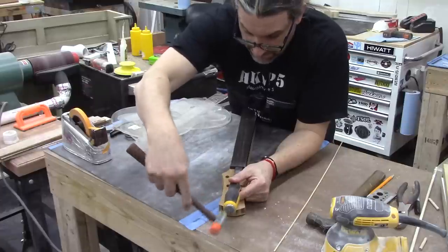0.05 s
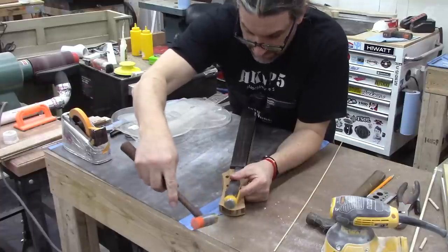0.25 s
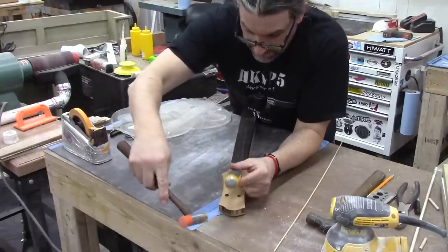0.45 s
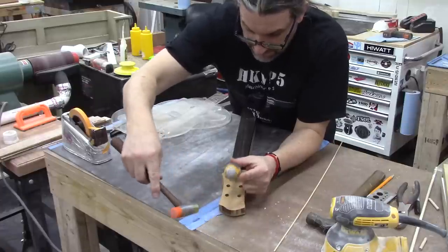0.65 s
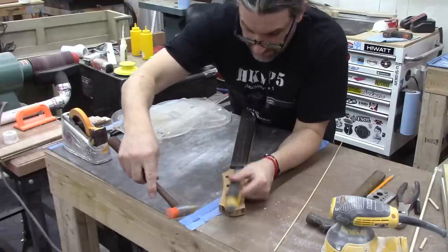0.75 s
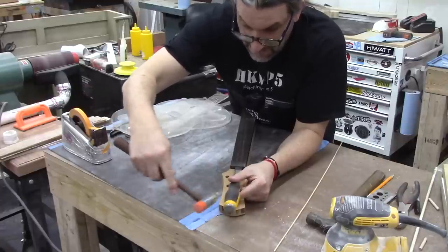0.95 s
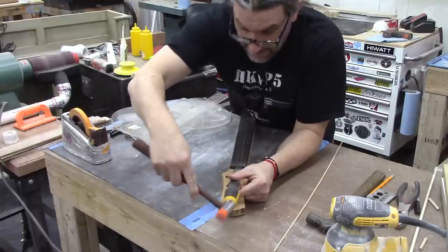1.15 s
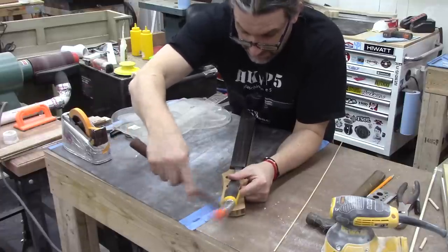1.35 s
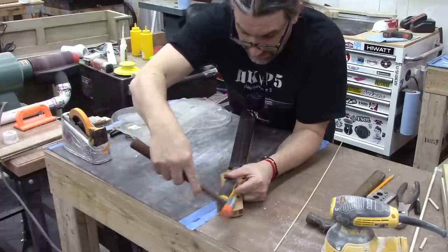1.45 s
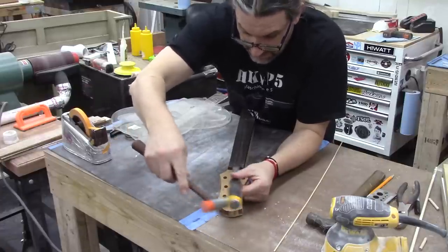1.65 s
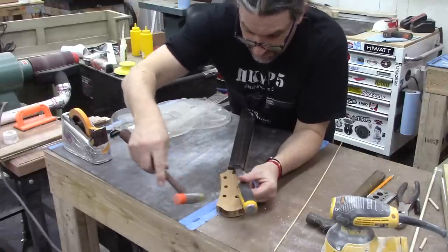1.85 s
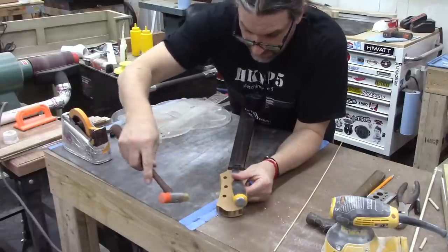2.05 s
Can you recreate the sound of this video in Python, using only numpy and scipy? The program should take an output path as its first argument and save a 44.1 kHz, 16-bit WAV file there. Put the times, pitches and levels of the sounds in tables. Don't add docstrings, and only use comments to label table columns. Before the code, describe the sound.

Hammer blows on hardwood: the echoing tail of one strike fades, a soft thud and tiny gritty ticks follow, then two quick sharp knocks ring out in a large workshop, picked up fairly close with squeezed attacks.

```python
import sys
import numpy as np
from scipy import signal
from scipy.fft import rfft, irfft
from scipy.io import wavfile
from scipy.ndimage import uniform_filter1d

SR = 44100
rng = np.random.default_rng(int(sys.argv[2]) if len(sys.argv) > 2 else 0)


def gain_from_db(level_db):
    decades = np.asarray(level_db, float) / 20
    return 10 ** decades


def generate_wav(signal):
    frames = np.transpose(np.atleast_2d(signal))
    scaled = np.clip(frames, -1, 1) * 32767
    pcm = np.round(scaled).astype(np.int16)
    wavfile.write(sys.argv[1], SR, pcm)


N = 92169
LEAD = 4410


def read(points, hz):
    f, value = np.transpose(points)
    return np.interp(np.log(hz + 1), np.log(f + 1), value)


def evened(x):
    return x / np.sqrt(np.mean(x ** 2) + 1e-20)


def coloured(x, points):
    size = x.shape[-1]
    return irfft(rfft(x) * gain_from_db(read(points, np.fft.rfftfreq(size, 1 / SR))), size)


def causal(gain):
    return np.fft.ifft(np.exp(np.conj(signal.hilbert(np.log(gain))))).real[:4096]


def add(mix, s, sound):
    part = mix[round(s * SR) + LEAD:][:len(sound)]
    part += sound[:len(part)]


def alternating_modes(modes, t):
    total = 0
    for k, (hz, db, t60) in enumerate(modes):
        total = total + (-1) ** k * gain_from_db(db - 60 * t / t60) * np.sin(2 * np.pi * hz * t)
    return total


# (frequency [Hz], level [dB per Hz])
AIR_SPECTRUM = [(25, -34), (60, -13), (110, -1), (300, -6.5), (800, -14), (2500, -22.5), (11000, -35.5),
                (16000, -52)]
# (centre [s], half length [s], level [dB], brightness [dB per octave])
RUSTLES = [
    (0.737, 0.015, -56, 0.5),
    (0.986, 0.085, -57.5, 0),
    (1.77, 0.12, -58, 4.5),
]
# (frequency [Hz], level [dB per Hz])
RUB_SPECTRUM = [(470, -56.5), (800, -14.5), (1690, 1), (2080, -5), (2970, -10), (4510, -11), (15000, -32)]
AIR_DB = -52.5
MOAN_S, MOAN_HALF_S, MOAN_HZ, MOAN_DB = 0.555, 0.078, 220, -51


def air():
    t = np.arange(N) / SR
    mid, side, rub = rng.standard_normal((3, N))
    waver = gain_from_db(1.2 * evened(uniform_filter1d(rng.standard_normal(N), size=3000)))
    grain = gain_from_db(1.9 * evened(uniform_filter1d(rng.standard_normal(N), size=150)))
    mid = gain_from_db(AIR_DB) * evened(coloured(mid, AIR_SPECTRUM)) * waver
    for s, half_s, db, tilt_db in RUSTLES:
        tilted = [(hz, top + tilt_db * np.log2(hz / 3000)) for hz, top in RUB_SPECTRUM]
        stroke = np.exp(-((t - s) / half_s) ** 2)
        mid += gain_from_db(db) * stroke * grain * evened(coloured(rub, tilted))
    swell = np.exp(-((t - MOAN_S) / MOAN_HALF_S) ** 2)
    mid += gain_from_db(MOAN_DB) * waver * swell * np.sin(2 * np.pi * MOAN_HZ * t)
    side = gain_from_db(AIR_DB - 10.5) * evened(coloured(side, AIR_SPECTRUM))
    return np.array([mid + side, mid - side])


# (frequency [Hz], level [dB], t60 [s])
THUD_MODES = [(105, 0, .35), (175, -1, .25), (215, -4, .2), (295, -4, .2), (400, -8, .25), (540, -4, .1),
              (650, -7, .2), (790, -5, .05)]
# (time [s], level [dB], frequency [Hz])
TICKS = [
    (.728, -54, 9000),
    (.752, -48, 7000),
    (.879, -47, 2500),
    (.943, -50, 9000),
    (.972, -46, 4600),
    (1.682, -48, 7500),
    (1.697, -51, 11000),
    (2.087, -48, 8500),
]
THUD_S, THUD_RISE_S, THUD_DB = .751, .002, -38.5
TICK_S = .0012


def handling():
    out, t = np.zeros(N + LEAD), np.arange(9000) / SR
    thud = alternating_modes(THUD_MODES, t)
    add(out, THUD_S, gain_from_db(THUD_DB) * thud * (1 - np.exp(-t / THUD_RISE_S)))
    t = t[:400]
    grit = rng.standard_normal((len(TICKS), 400))
    for (s, db, hz), noise in zip(TICKS, grit):
        add(out, s, gain_from_db(db) * np.exp(-t / TICK_S) * (np.sin(2 * np.pi * hz * t) + 0.42 * noise))
    return out


# (frequency [Hz], t60 [s])
HALL_T60 = [(100, 0.41), (330, 1.24), (700, 0.98), (1100, 1.162), (2300, 0.94), (4500, 0.74), (7000, .5),
            (16000, 0.31)]
# (frequency [Hz], side under mid [dB])
HALL_SPREAD = [(60, -34), (180, -59), (550, -31), (1650, -21), (4970, -13.5), (15000, -17)]
HALL_RISE_S, HALL_TOP_HZ = .013, 14600


def hall(x):
    hz, t, z = signal.stft(rng.standard_normal((2, 70000)), SR, nperseg=256)
    z = z * gain_from_db(-60 * t / read(HALL_T60, hz)[:, None]) / (1 + (hz[:, None] / HALL_TOP_HZ) ** 20)
    tail = signal.istft(z, SR, nperseg=256)[1][:, :70000]
    tail = tail * (1 - np.exp(-(np.arange(70000) / SR / HALL_RISE_S) ** 1.3))
    mid, side = tail[0], coloured(tail[1], HALL_SPREAD)
    taps = np.array([mid + side, mid - side]) / np.linalg.norm(mid)
    return signal.fftconvolve(x[None], taps, axes=1)[:, :len(x)]


def scatter(spread_s):
    t = np.arange(1024) / SR
    z = rfft(rng.standard_normal((2, 1024)) * np.exp(-(t / spread_s) ** 2))
    flat = irfft(z / (abs(z) + .25 * abs(z).mean()))[:, :512]
    mid, side = flat * np.exp(-(t[:512] / (2 * spread_s)) ** 2)
    return np.array([mid + .1 * side, mid - 0.14 * side]) / np.linalg.norm(mid)


# (delay [s], level [dB], lean to the left [ratio])
ECHOES = [
    (.0112, -11, .1),
    (.0208, -10, -.1),
    (.031, -13, .1),
]
# (frequency [Hz], level [dB])
NEAR_COLOUR = [(100, -14), (700, 0), (1600, -5), (2600, -0.5), (4300, 4), (6000, -2.5), (8500, 8.5),
               (16000, 6.5)]
RATTLE_S, RATTLE_DB = 0.0051, 3


def near(x):
    taps = np.zeros((2, 3000))
    taps[:, :512] = gain_from_db(RATTLE_DB) * scatter(RATTLE_S)
    for s, db, lean in ECHOES:
        echo = gain_from_db(RATTLE_DB + db) * scatter(RATTLE_S / 2) * [[1 + lean], [1 - lean]]
        taps[:, round(s * SR):][:, :512] += echo
    hz = abs(np.fft.fftfreq(8192, 1 / SR))
    direct = signal.oaconvolve(x, causal(gain_from_db(read(NEAR_COLOUR, hz))))
    return signal.oaconvolve(direct[None], taps, axes=1)[:, :len(x)]


# (time [s], modes [(frequency [Hz], level [dB], t60 [s])])
KNOCKS = [
    (1.1319, [(1640, -4.5, 0.05), (2075, -4, 0.052), (2440, -11, 0.039), (4440, -11.5, 0.036), (8670, -12, 0.022)]),
    (1.353, [(2540, -4.5, 0.029), (3000, -23, .025), (3880, -8, 0.022), (4350, -21, 0.028), (7360, -2, 0.015)]),
]
KNOCK_RISE_S = 0.0017


def knocks():
    out, t = np.zeros(N + LEAD), np.arange(4000) / SR
    for s, modes in KNOCKS:
        add(out, s, alternating_modes(modes, t) * (1 - np.exp(-t / KNOCK_RISE_S)))
    return out


def blow(db, modes, colour):
    hz = abs(np.fft.fftfreq(16384, 1 / SR))
    ring = sum(gain_from_db(2 * top_db) / (1 + (2 * (hz - f) / width) ** 2) ** 0.85 for f, width, top_db in modes)
    crack = gain_from_db(2 * read(colour, hz))
    return gain_from_db(db) * 10 * causal(np.sqrt(ring * (hz / (hz + 300)) ** 2 + crack))


# (time [s], level [dB])
BLOWS = [
    (-.03, 3),
    (1.1297, 10),
    (1.352, 5.5),
]
# (frequency [Hz], width [Hz], level [dB])
BLOW_MODES = [
    [(459.5, 44, -2), (951, 41, 8), (1139, 31, 8.5), (1350, 74, -4), (2002, 122, 7.5), (2879, 46, 5.5),
     (3000, 40, -19), (3846, 92, 0), (4490, 260, -6), (5370, 360, -4)],
    [(440, 53, -16), (1640, 54, -3), (2063, 81, -2), (2394, 300, -10.5), (2900, 90, -30), (2926, 41, -6.5),
     (3770, 33, -18.5), (3984, 140, -14.5), (5200, 270, -16), (9010, 190, -20.5)],
    [(969, 20, -2.5), (1506, 90, -2.5), (2110, 93, -7.5), (2540, 33, 1), (2910, 107, -2.5),
     (3820, 110, -8.5), (4360, 150, -7), (5170, 450, -10), (5590, 140, -9.5), (7300, 680, -15.5)],
]
# (frequency [Hz], level [dB per Hz])
BLOW_CRACKS = [
    [(60, -39), (160, -16), (700, -30.5), (2500, -3), (6000, -19.5), (10000, -25.5), (14000, -36),
     (16500, -27)],
    [(60, -48), (160, -22), (700, -22.5), (2500, -24.5), (6000, -18.5), (10000, -31.5), (14000, -37.5),
     (16500, -48)],
    [(60, -35), (160, -32), (700, -20), (2500, -13.5), (6000, -17), (10000, -23.5), (14000, -39.5),
     (16500, -49)],
]


def hammer_blows():
    out = np.zeros(N + LEAD)
    for (s, db), modes, colour in zip(BLOWS, BLOW_MODES, BLOW_CRACKS):
        add(out, s, blow(db, modes, colour))
    return out


def scene():
    small = handling()
    hits = hammer_blows()
    wet = hall(gain_from_db(7) * hits + gain_from_db(-9) * small)
    return (near(hits) + knocks() + small + wet)[:, LEAD:] + air()


def low_pass(x):
    return signal.sosfilt(signal.butter(12, 16580, fs=SR, output="sos"), x)


CEILING_DB, RECOVER_DB_PER_S, GRAB_S = -4.5, 342.5, 0.012
MIC_LOW_HZ, EDGE_HZ = 68, 16400


def record(dry):
    peak_db = 20 * np.log10(abs(dry).max(0) + 1e-9)
    rise = np.arange(N) * RECOVER_DB_PER_S / SR
    held_db = np.maximum.accumulate(peak_db + rise) - rise
    over_db = np.maximum(held_db - CEILING_DB, 0)
    keep = np.exp(-1 / (GRAB_S * SR))
    cut_db = signal.lfilter([1 - keep], [1, -keep], over_db, zi=[over_db[200]])[0]
    limited = dry / gain_from_db(cut_db)
    soft = limited / (1 + abs(limited) ** 4) ** (1 / 4)
    soft = signal.lfilter(*signal.butter(2, MIC_LOW_HZ, "high", fs=SR), soft)
    soft = signal.oaconvolve(soft, signal.firwin(255, EDGE_HZ, fs=SR)[None], "same")
    return low_pass(soft)


dry = scene()
out = record(dry)
generate_wav(out)
```